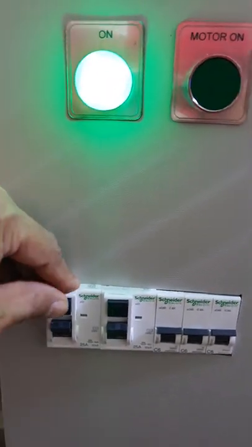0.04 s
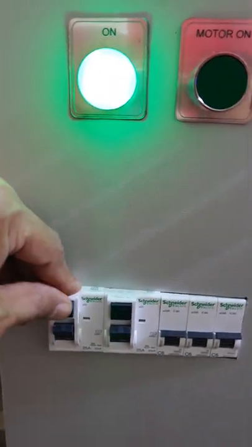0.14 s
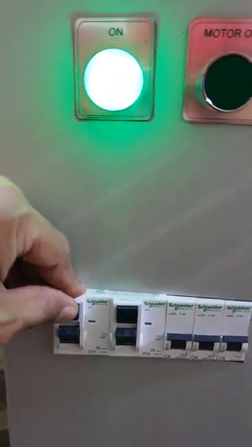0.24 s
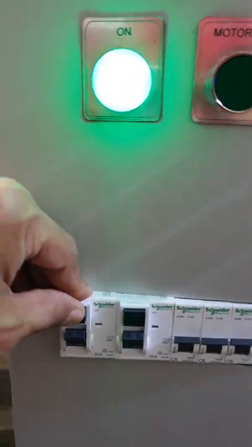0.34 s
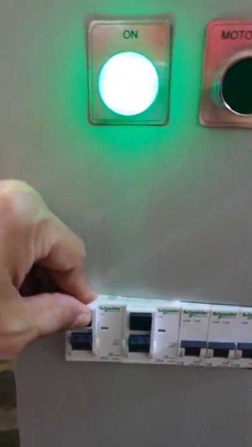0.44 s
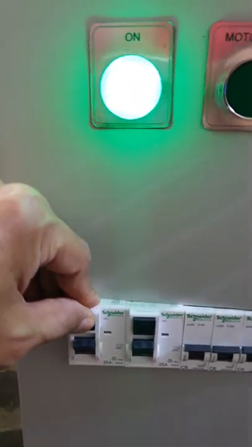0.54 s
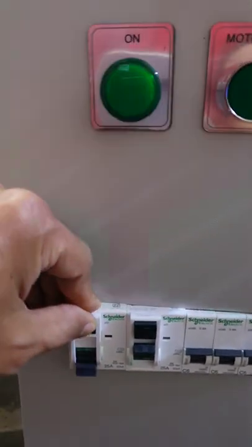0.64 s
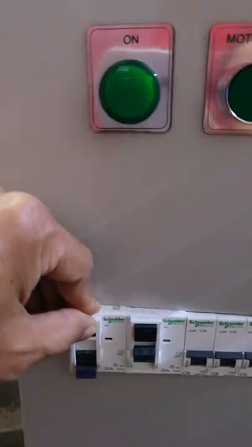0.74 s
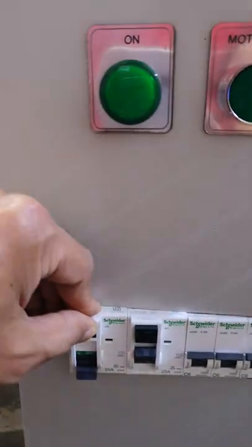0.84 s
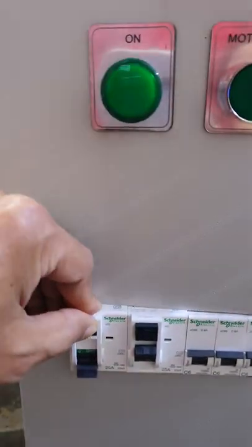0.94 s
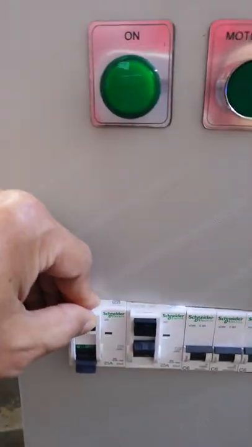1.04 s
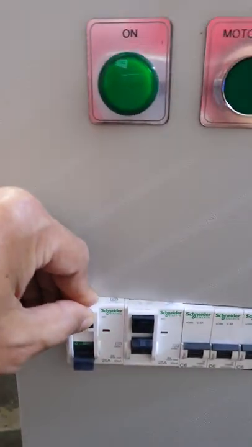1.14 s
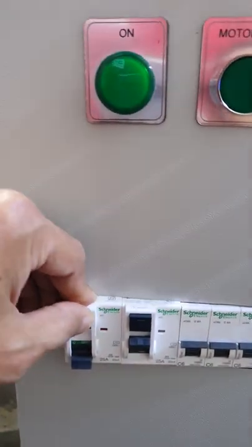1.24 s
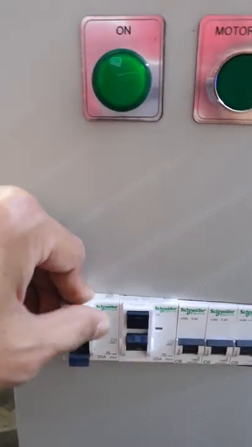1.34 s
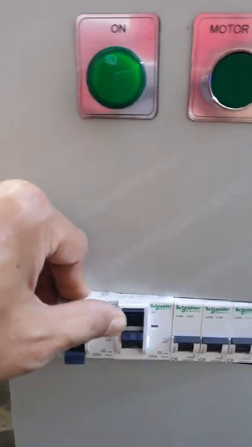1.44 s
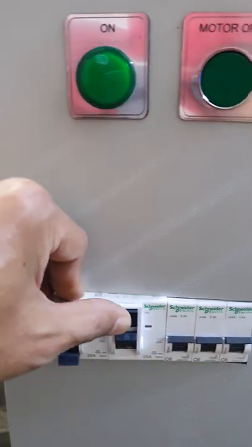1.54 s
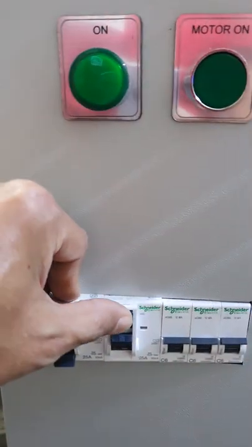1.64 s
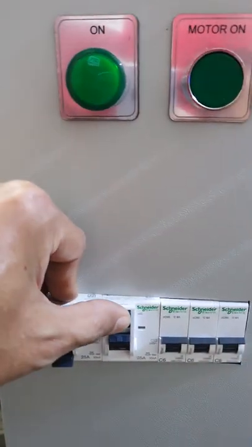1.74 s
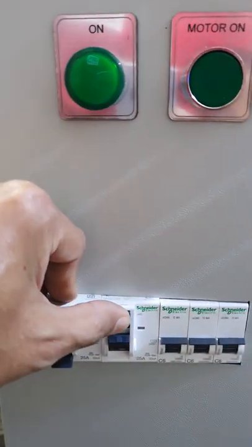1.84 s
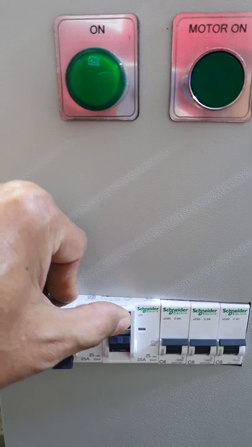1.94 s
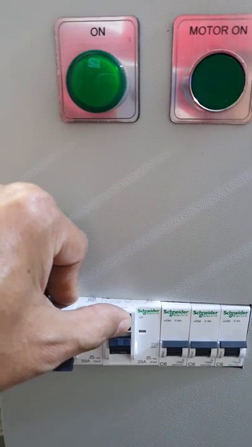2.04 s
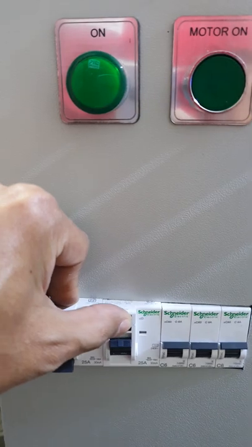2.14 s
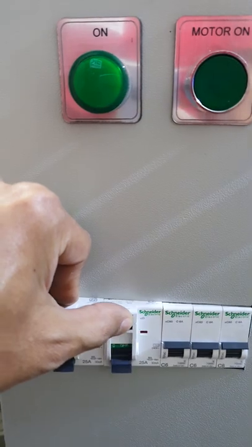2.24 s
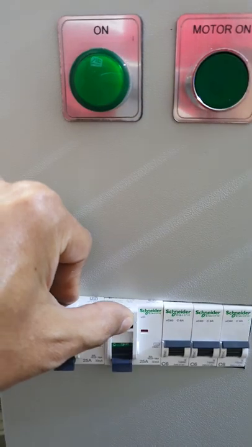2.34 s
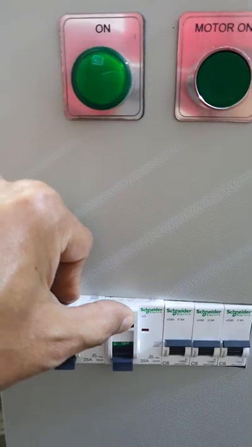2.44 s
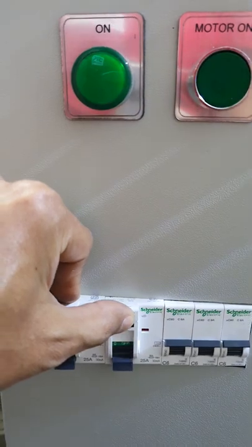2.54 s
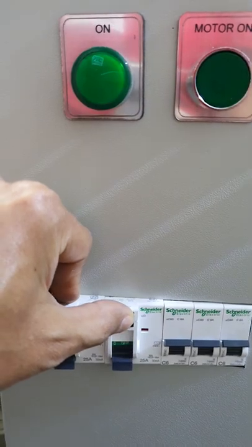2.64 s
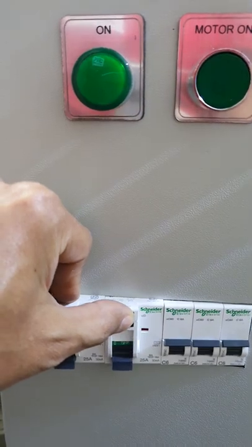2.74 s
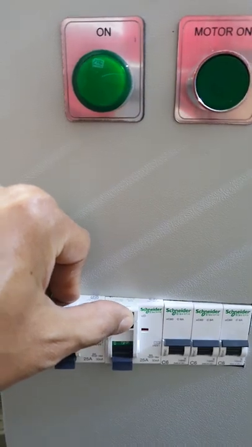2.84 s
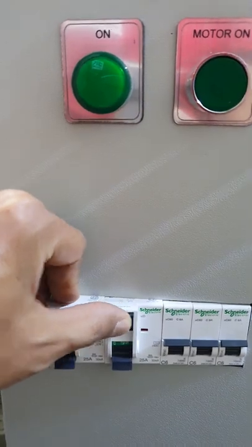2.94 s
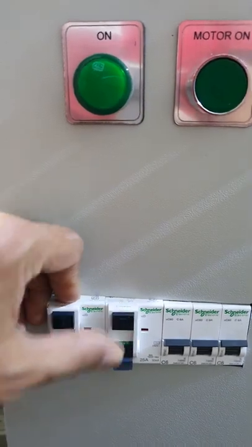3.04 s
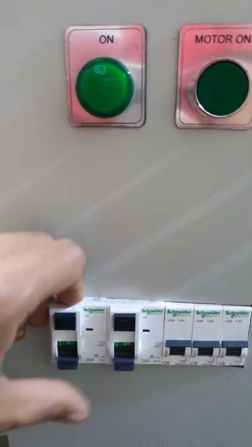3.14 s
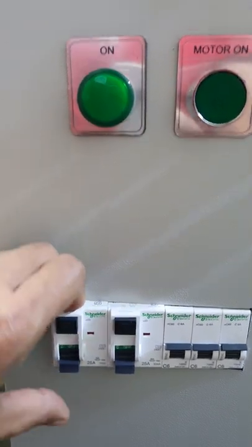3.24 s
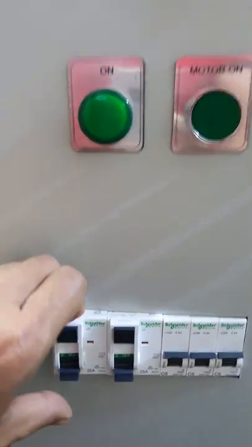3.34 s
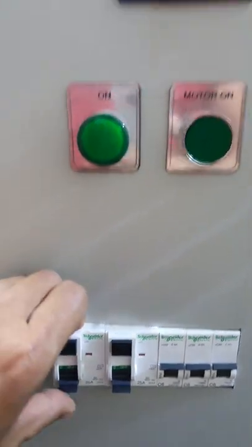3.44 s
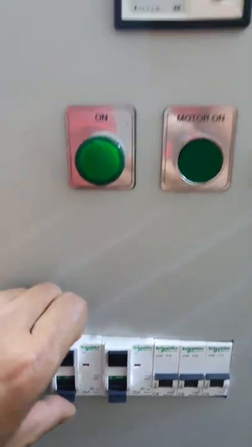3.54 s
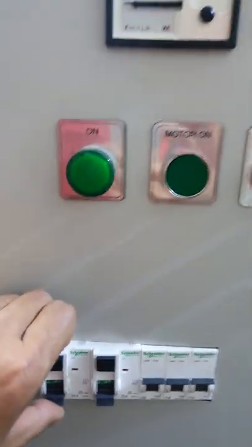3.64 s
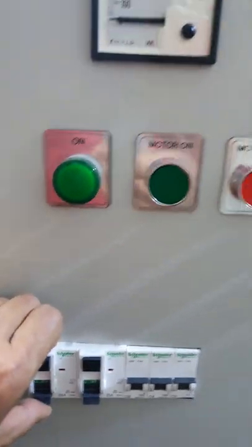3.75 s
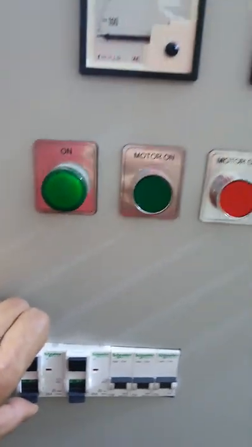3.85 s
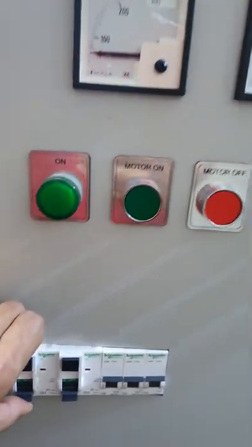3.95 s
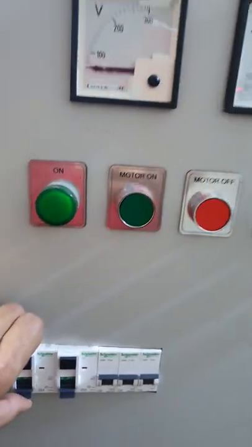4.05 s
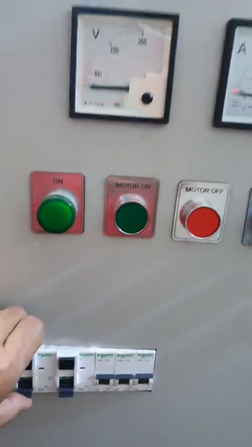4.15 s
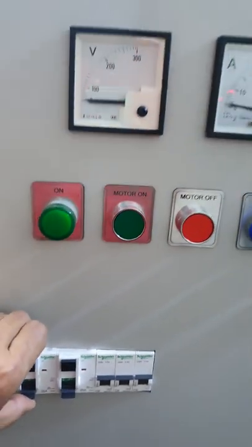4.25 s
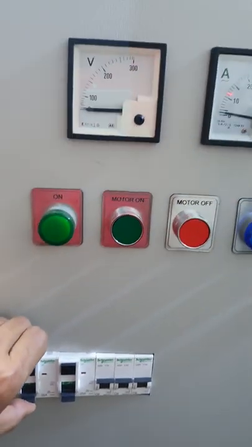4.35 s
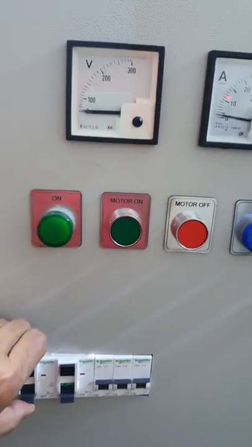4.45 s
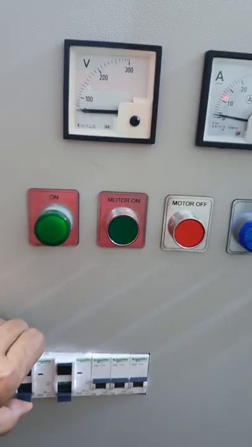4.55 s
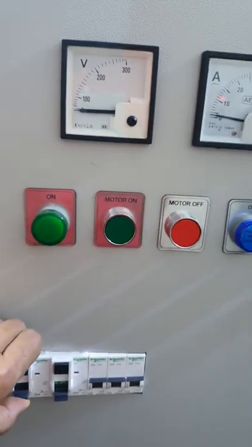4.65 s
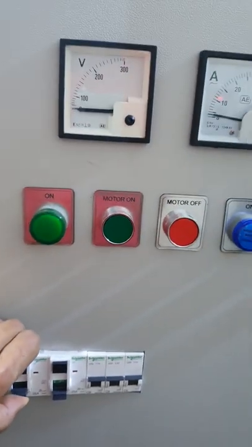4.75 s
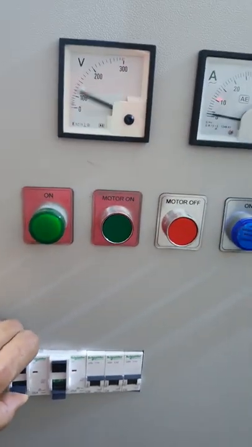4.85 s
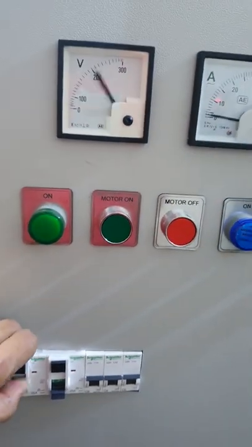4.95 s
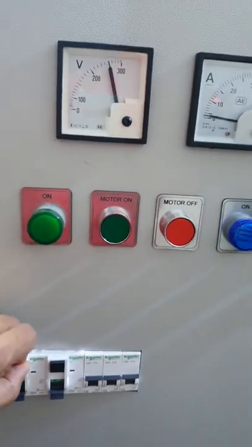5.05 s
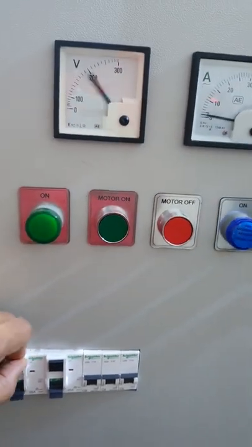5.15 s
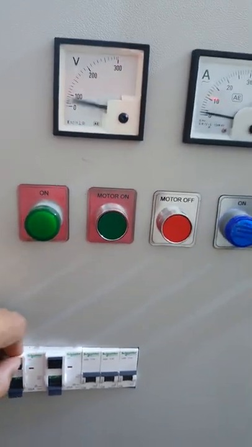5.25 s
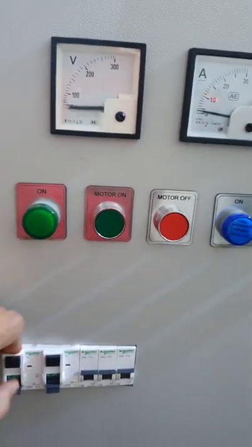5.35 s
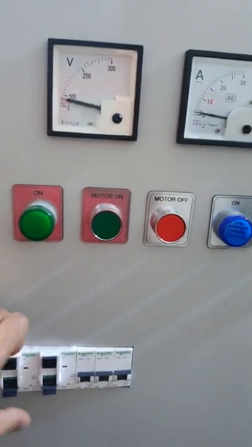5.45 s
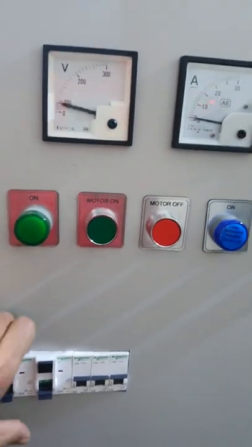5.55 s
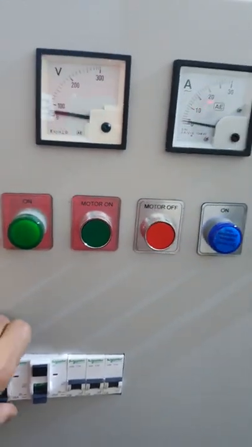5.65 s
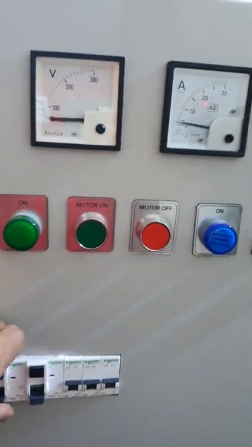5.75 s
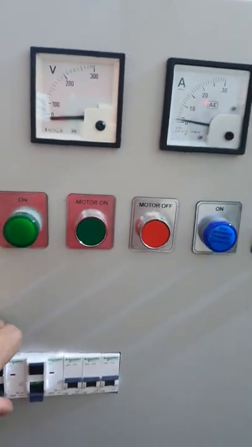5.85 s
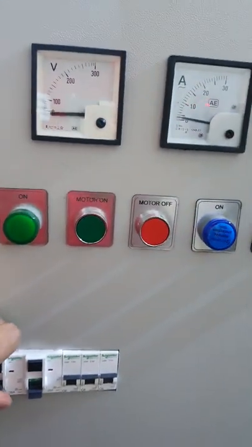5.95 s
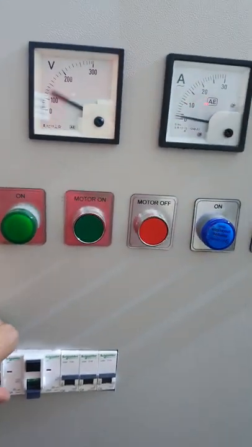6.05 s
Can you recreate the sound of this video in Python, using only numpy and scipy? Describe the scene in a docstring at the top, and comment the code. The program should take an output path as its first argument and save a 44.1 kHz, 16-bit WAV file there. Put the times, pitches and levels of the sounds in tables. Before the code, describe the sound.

A handheld stereo microphone near a metal panel picks up quiet rumble and a faint wavering high fan tone. Two separated breaker throws crack out, each a tight cluster of impacts with plastic ring, door boom and short room echo. Later, as the microphone has backed away and the whine shifts, a quick click-click-clack bursts loudly, then only faint spring ticks and a light click remain.

```python
"""Breakers flipped on a steel cabinet

Circuit breakers are flipped by hand, close to a phone in a hard-walled room: two snap off, a third is
latched and closed. Each throw is a quick cluster of noisy impacts with the decaying tones of a plastic case.
The blows make the steel door boom (more decaying tones), and filtered noise gives the room's echo.
Two fans whine faintly (wavering sine tones) over a low rumble (filtered noise)."""
import sys
import numpy as np
from scipy import signal
from scipy.fft import rfft, irfft
from scipy.io import wavfile

SR = 44100
rng = np.random.default_rng(int(sys.argv[2]) if len(sys.argv) > 2 else 0)


def wrap_up_sound(samples):
    """Save the sound to the file named by the first command line argument, as 16-bit audio."""
    columns = np.atleast_2d(samples).T
    # keep every value between -1 and 1, then stretch to whole-number steps
    tamed = np.clip(columns, -1, 1)
    steps = np.round(tamed * 32767).astype(np.int16)
    wavfile.write(sys.argv[1], SR, steps)


N = 269010
TIME = np.arange(N) / SR


def undb(db):
    """Turn decibels into a plain gain."""
    return 10 ** (np.asarray(db) / 20)


def on_log(hz, points, axis=1):
    """Read one column of a table on a log-frequency axis."""
    table = np.array(points, float)
    return np.interp(np.log(np.maximum(hz, 1)), np.log(table[:, 0]), table[:, axis])


def fade(t, t60):
    """Exponential decay, 60 dB down after t60 seconds."""
    return np.exp(-np.log(1000) * t / max(t60, 1e-4))


def add(track, sound, at):
    """Mix a sound into a track at a time in seconds."""
    start = int(at * SR)
    track[..., start:start + sound.shape[-1]] += sound[..., :N - start]


def colour(x, points, size=1024):
    """Filter with a (f/Hz, level/dB) response that never sounds before its input (minimum phase)."""
    cepstrum = irfft(np.log(undb(on_log(np.fft.rfftfreq(size, 1 / SR), points))))
    # folding the cepstrum forward in time gives the minimum phase
    cepstrum[1:size // 2] *= 2
    cepstrum[size // 2 + 1:] = 0
    response = irfft(np.exp(rfft(cepstrum)))
    return signal.fftconvolve(x, response)[:len(x)]


def diffuse(size, spacing_s=0.00042):
    """Spectra of noise from all sides at two microphones: alike in the bass, unrelated above."""
    hz = np.fft.rfftfreq(size, 1 / SR)
    alike = np.sinc(2 * hz * spacing_s)
    mid, side = rfft(rng.standard_normal((2, size)))
    mid = mid * np.sqrt((1 + alike) / 2)
    side = side * np.sqrt((1 - alike) / 2)
    return hz, np.array([mid + side, mid - side])


def walk(rate):
    """Slow random drift around zero, with `rate` new random values per second joined by lines."""
    knots = rng.standard_normal(400)
    return np.interp(TIME * rate, np.arange(len(knots)), knots)


# The phone drifts in from the side to the breakers, then backs away to take in the meters.
# Columns: t/s, place (-1 aside, 0 close, 1 far)
PHONE_PATH = [(0, -.95), (.35, -0.72), (.9, -0.32), (3.2, 0.2), (3.8, 0.45), (4.2, 0.98), (4.9, 0.96),
              (5.5, 0.79)]


def place(at):
    """Where the phone is held: -1 aside, 0 close to the breakers, 1 far back."""
    return np.interp(at, *np.transpose(PHONE_PATH))


def distance(at):
    """How far back the phone is held, from 0 close to 1 far."""
    return np.maximum(place(at), 0)


# Colour of the rumble and rush of air. Columns: f/Hz, level/dB
RUMBLE_COLOUR = [(15, -36.5), (35, -19.5), (60, 2), (95, 2), (115, -10.5), (240, -6), (320, -14.5),
                 (550, -14), (1000, -17.5), (1450, -20), (1900, -14), (2850, -21), (3700, -25.5),
                 (7500, -50), (16000, -44.5)]
# Slow course of the rumble's loudness. Columns: t/s, level/dB
RUMBLE_LEVEL = [(0, -54.5), (1.4, -55.5), (3.1, -57.5), (4.7, -55.5), (5.6, -57.5)]


def rumble(sway_db=0.44, left_db=0, right_db=-2):
    """Low rumble of the plant room with a little rush of air: filtered noise that sways in level."""
    hz, noise = diffuse(N)
    air = irfft(noise * undb(on_log(hz, RUMBLE_COLOUR)), N)
    level_db = np.interp(TIME, *np.transpose(RUMBLE_LEVEL)) + sway_db * walk(2.2)
    return air / air.std() * undb(level_db) * undb([[left_db], [right_db]])


def tone(hz, db, apart=0, waver_db=5.0, wobble_hz=0.33, drift=1.0):
    """A machine tone that wavers on its own at each microphone; apart and drift are phases in radians."""
    phase = 2 * np.pi * np.cumsum(hz + wobble_hz * walk(16)) / SR
    pair = []
    for offset in (apart, 0):
        waver = undb(waver_db * walk(3.6))
        pair.append(waver * np.sin(phase + offset + drift * walk(0.5)))
    return np.sqrt(2) * undb(db) * np.array(pair)


# Machine tones besides the fans. Columns: f/Hz, level/dB
HUM_TONES = [(99, -72), (139, -64.5), (261, -72), (392, -76.5), (1203, -80.5), (2271, -75), (2360, -76.5),
             (2637, -75), (2807, -77), (2915, -84.5), (3469, -83.5)]


def hum():
    """Steady machine tones; long waves reach both microphones nearly in step."""
    return sum(tone(hz, db, min(hz / 1000, np.pi / 2)) for hz, db in HUM_TONES)


# How often the blades pass, slow fan then fast fan. Columns: f/Hz at the start, rise/(Hz per s)
BLADE_RATES = [(533.85, .19), (554.4, .27)]


def blade_rates():
    """Blade rates in Hz of the slow and the fast fan, both creeping up."""
    return [hz + rise * TIME for hz, rise in BLADE_RATES]


# Weaker fan harmonics. Columns: multiple of the blade rate, slow fan level/dB, fast fan level/dB
WEAK_HARMONICS = [(1, -76, -78.5), (2, -85, -73.5), (3, -75.5, -92), (6, -79.5, -80.5)]


def fan_overtones():
    """The weaker harmonics of both fans, each a faint wavering tone."""
    slow, fast = blade_rates()
    out = 0
    for multiple, slow_db, fast_db in WEAK_HARMONICS:
        for rate, db in ((slow, slow_db), (fast, fast_db)):
            out = out + tone(round(multiple) * rate, db, 1.0, waver_db=3.0, drift=0.17)
    return out


# Whine in the standing waves of the room: 4th and 5th harmonic of the slow fan, then of the fast fan.
# Columns: close level/dB, change far or aside/dB, swell at the antinode/dB,
# close left-right/dB, far left-right/dB, close phase between microphones/rad, far phase/rad
WHINE_TONES = [(-66, -3, 12, -3, -8, .2, 3), (-74.5, 10.5, -5, -11.5, 16.5, 1.5, 1.34),
               (-68, -0.5, 9, 2.5, -19.5, .1, 1.4), (-68.5, 13, -1.5, -2, -7, 0.81, 2.5)]


def fan_whine(antinode=0.54, antinode_width=0.2):
    """Strong fan harmonics pass through quiet and loud spots of standing waves as the phone moves."""
    slow, fast = blade_rates()
    far, off_node = distance(TIME), np.abs(place(TIME))
    # 1 where the phone is at the antinode, on its way from 0 close to 1 far
    at_antinode = np.exp(-((far - antinode) / antinode_width) ** 2)

    def between(close, away):
        """Blend from the close to the far setting."""
        return close + (away - close) * far

    out = 0
    for hz, row in zip((4 * slow, 5 * slow, 4 * fast, 5 * fast), WHINE_TONES):
        close_db, change_db, swell_db, close_pan, far_pan, close_rad, far_rad = row
        pan_db = between(close_pan, far_pan) * np.array([[0.5], [-0.5]])
        db = close_db + change_db * off_node + swell_db * at_antinode + pan_db
        out = out + tone(hz, db, between(close_rad, far_rad), waver_db=2.23, drift=0.45)
    return out


# A breaker snaps over. Columns: t/s, duration/s, level/dB, treble tilt/(dB per octave),
# case ring/dB, metallic presence/dB, room/dB
BREAKER_THROWS = [(0.6148, .0075, .5, 0.63, -2, 1, 0), (2.2458, 0.0057, -6, 1.5, 3.5, -2.5, 4.5),
                  (5.0201, 0.0073, 0.5, 1.3, 0, 3.5, -2)]
# Every throw runs through latch, contacts, toggle and rebound.
# Columns: share of the duration, level/dB, treble tilt/(dB per octave)
THROW_PARTS = [(0, -6, -1), (0.382, -3, 2.5), (.66, 0, 1), (1, -3, -4)]
# Single clicks of a latch or toggle. Columns: t/s, level/dB, treble tilt/(dB per octave),
# case ring/dB, metallic presence/dB, room/dB
SINGLE_CLICKS = [(1.2728, -34.5, 0, -9, -8, -3), (2.2444, -27, 2, 2.5, -10, -1),
                 (4.9407, -2, 0.5, -12.5, 4, 2.5), (4.9802, 0, -2, -10, -6.5, -5),
                 (5.2675, -33.5, -2.5, -20.5, 1, 1.5), (6.0828, -24, -3, 3, -1, 7.5)]


def strikes():
    """All impacts, in the columns of SINGLE_CLICKS: each throw unfolds into its parts, then the clicks."""
    hits = []
    for at, duration, db, tilt, case_db, presence_db, room_db in BREAKER_THROWS:
        for share, part_db, part_tilt in THROW_PARTS:
            hits.append((at + share * duration, db + part_db, tilt + part_tilt,
                         case_db, presence_db, room_db))
    return hits + list(SINGLE_CLICKS)


def voicing(hz, tilt, presence_db, presence_hz=2700, octaves=0.45):
    """Gain in dB of one impact: harder contact is brighter, metal parts add a presence hump."""
    hump = np.exp(-(np.log2(hz / presence_hz) / octaves) ** 2)
    return tilt * np.log2(max(hz, 1000) / 3000) + presence_db * hump


# Reverberation of the room, band by band. Columns: f/Hz, level/dB, t60/s
ROOM_BANDS = [(45.6, 5, 1), (100, 10.5, 2.7), (200, 10.5, 1.1), (390, 15.5, .58), (780, 12.5, .47),
              (1199, 2, 0.46), (1700, -0.5, .41), (2560, 1.5, .41), (4220, 6.5, 0.38), (6460, -0.5, .36),
              (10125, 2, 0.32), (16000, 5.5, .24)]


def room(wet_db=-23, build_s=0.0068, gap_s=0.0016, case_share=0.57, case_hz=1200, case_width_hz=250):
    """Every impact feeds a noise tail that thickens over the first milliseconds; the treble dies first."""
    t = TIME[:SR]
    hz, noise = diffuse(N)
    # random fine peaks and dips roughen the colour of the tail
    ripple_db = 1.8 * np.interp(hz, np.linspace(0, SR / 2, 400), rng.standard_normal(400))
    noise = noise * undb(on_log(hz, IMPACT_COLOUR) + ripple_db)
    build = 1 - np.exp(-np.maximum(t - gap_s, 0) / build_s)
    out = 0
    for k, (centre, band_db, t60) in enumerate(ROOM_BANDS):
        tail_power = (build * fade(t, t60)) ** 2
        power = np.zeros(N)
        # the ringing case feeds the bands near its own pitch
        near_case = case_share * np.exp(-((centre - case_hz) / case_width_hz) ** 2)
        for at, db, tilt, case_db, presence_db, room_db in strikes():
            gain = undb(db + room_db + voicing(centre, tilt, presence_db))
            gain = gain * (1 + near_case * undb(case_db))
            add(power, gain ** 2 * tail_power, at)
        # this band fades into its neighbours
        band = on_log(hz, [(row[0], j == k) for j, row in enumerate(ROOM_BANDS)])
        # each band of the tail flickers a little in level, at random
        flicker_db = 1.1 * walk(60)
        out = out + undb(band_db + flicker_db) * irfft(noise * band, N) * np.sqrt(power)
    return undb(wet_db) * out


# Blows that reach the cabinet.
# Columns: t/s, level/dB, tilt/(dB per octave), favoured f/Hz, favoured by/dB
DOOR_BLOWS = [(0.618, 4, 0.5, 175, 1), (2.252, 3.5, 0, 374.5, 17.5), (4.56, -27, -1.5, 200, 5.5),
              (4.941, -13, 2.5, 116.3, 10.5), (5.022, -2.5, 5, 192, 9), (6.081, -18.5, 2, 300, 16.5)]
# Steel door and cabinet modes (natural tones). Columns: f/Hz, level/dB, t60/s
DOOR_MODES = [(56.2, -20, 1.6), (77.97, -23.5, 1.1), (115.4, -9.5, 0.61), (148.7, -15.5, .5),
              (161.4, -5.5, 0.64), (171.4, -3.5, 0.4), (190, 9.5, .09), (200, -7, 0.74),
              (217.4, -14.5, 1.1), (270.3, -12.5, 0.35), (309.2, -21.5, 0.83), (337, -16, 0.7),
              (394, -14.5, 0.77), (422.7, -15, 0.72), (465, -24.5, 0.18), (490, -20, 0.46), (545, -25, .25),
              (604, -21, 0.37), (791, -21, 0.49), (767, -19, 0.41)]


def door(boom_db=-19, swell_cycles=2.9, scatter_db=1, apart_hz=520, favour_octaves=0.057, right_db=0.5):
    """Blows spread through sheet steel: low modes swell slowest, high ones reach the microphones out of step."""
    t = TIME[:2 * SR]
    out = np.zeros((2, N))
    for at, level, tilt, favoured_hz, favour_db in DOOR_BLOWS:
        chance = rng.standard_normal((len(DOOR_MODES), 2))
        boom = 0
        for k, (hz, db, t60) in enumerate(DOOR_MODES):
            # where the blow lands decides which modes it drives best
            place_db = favour_db * np.exp(-(np.log2(hz / favoured_hz) / favour_octaves) ** 2)
            mode_db = db + place_db + tilt * np.log2(hz / 180) + scatter_db * chance[k, 0]
            gain = (-1) ** k * undb(mode_db)
            envelope = fade(t, t60) * (1 - np.exp(-t * hz / swell_cycles))
            apart = min((hz / apart_hz) ** 2, 1) * chance[k, 1] * np.array([[1], [-1]])
            boom = boom + gain * envelope * np.sin(2 * np.pi * hz * t + apart)
        add(out, undb(level + boom_db) * boom, at)
    return out * undb([[0], [right_db]])


# Light creaks of a toggle under the thumb. Columns: t/s, level/dB, ring t60/s
TOGGLE_CREAKS = [(4.8200, -60.5, 0.5), (4.8905, -61, 0.54), (5.64, -62, 0.81), (5.922, -67, 0.45),
                 (5.9650, -69, 0.28), (6.0145, -64, 0.65)]
# Resonances of the toggle spring. Columns: f/Hz, half-width/Hz, level/dB
SPRING_MODES = [(3940, 700, -0.5), (5440, 400, -5.5), (6510, 630, -11.5), (9650, 448, -12)]


def creaks(tick_db=12, tick_t60=0.0067):
    """The toggle spring takes up load in small slips, each a faint tick with a thin ring."""
    t = TIME[:SR]
    envelope = np.zeros(N)
    for at, db, t60 in TOGGLE_CREAKS:
        add(envelope, undb(db) * (fade(t, t60) + undb(tick_db) * fade(t, tick_t60)), at)
    hz, noise = diffuse(N)
    response = sum(undb(db) / (1 + ((hz - centre) / width) ** 2) for centre, width, db in SPRING_MODES)
    ring = irfft(noise * response, N)
    return undb(-6.0) * envelope * ring / ring.std()


# Early reflections from the hand, cabinet and wall. Columns: delay/s, level/dB
EARLY_ECHOES = [(.0085, -15.5), (.0205, -15), (.0275, -14.5), (.047, -14.5)]


def reflections(x, dull_hz=5000):
    """Near hard surfaces throw back duller copies, crossing over to the other microphone."""
    low_pass = signal.butter(2, dull_hz, fs=SR, output="sos")
    dull = signal.sosfilt(low_pass, x[::-1])
    out = np.zeros((2, N))
    for delay, db in EARLY_ECHOES:
        add(out, undb(db) * dull, delay)
    return out


# Colour of an impact, also used for its tail in room(). Columns: f/Hz, level/dB
IMPACT_COLOUR = [(60, -36), (200, -6.5), (500, -7), (1000, -1), (1800, 9), (2600, 7), (3800, 1.5),
                 (5500, 0.5), (6800, 0), (7500, -8), (9500, -5), (12000, -7.5), (15500, -18.5)]
# Plastic case modes (natural tones). Columns: f/Hz, level/dB, t60/s
CASE_MODES = [(940, -10, 0.029), (1171, -6, 0.077), (1235, 2.5, 0.096), (1578, -11, 0.016),
              (1930, -4.5, 0.016), (3070, -9.5, .02), (6830, -13, 0.079)]


def impacts(snap_db=10, tick_db=-3, ring_db=-21, rattle_t60=0.02, lag_close_ms=0.067, lag_far_ms=0.3):
    """Each impact is a hard tick, a short rattle of settling springs and levers, and the ring of the case."""
    t = TIME[:SR // 10]
    ring = sum(undb(db) * fade(t, t60) * np.sin(2 * np.pi * hz * t) for hz, db, t60 in CASE_MODES)
    tick = undb(tick_db) * (t == 0)
    out = np.zeros((2, N))
    for at, db, tilt, case_db, presence_db, _ in strikes():
        # the click reaches the left microphone a little later than the right
        late_ms = lag_close_ms + (lag_far_ms - lag_close_ms) * distance(at)
        spectrum = [(hz, level + voicing(hz, tilt, presence_db)) for hz, level in IMPACT_COLOUR]
        shared = rng.standard_normal(len(t))
        for channel, lag in enumerate((late_ms / 1000, 0)):
            rattle = (shared + rng.standard_normal(len(t))) * fade(t, rattle_t60)
            crack = colour(tick + rattle / np.linalg.norm(rattle), spectrum)
            hit = undb(snap_db) * crack + undb(ring_db + case_db) * ring
            add(out[channel], undb(db) * hit, at + lag)
    return out


# The right microphone is shaded, most of all in the top octave. Columns: f/Hz, level/dB
RIGHT_SHADE = [(100, -2), (700, -2), (2400, 0), (4500, .5), (6500, -2), (8000, -10), (10000, -12),
               (13000, -9.5), (16000, -8)]


def scene():
    """Steady machines, the booming door, and the clacks with their reverberation."""
    machines = rumble() + hum() + fan_overtones() + fan_whine()
    clacks = impacts()
    left, right = clacks + reflections(clacks) + room() + creaks()
    return machines + door() + np.array([left, colour(right, RIGHT_SHADE)])


def record(dry, top_hz=15900):
    """The phone rounds the highest peaks and cuts the top."""
    low_pass = signal.ellip(8, 0.2, 70, top_hz, fs=SR, output="sos")
    return signal.sosfilt(low_pass, np.tanh(dry))


dry = scene()
out = record(dry)
wrap_up_sound(out)
```